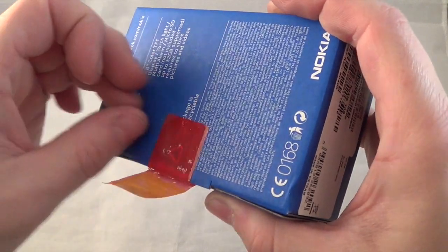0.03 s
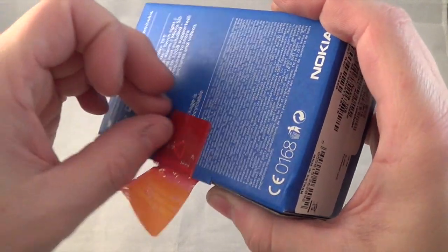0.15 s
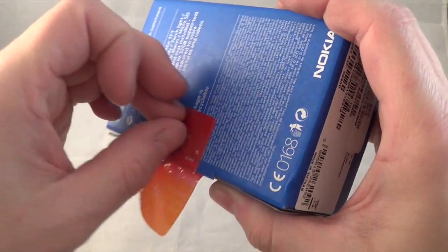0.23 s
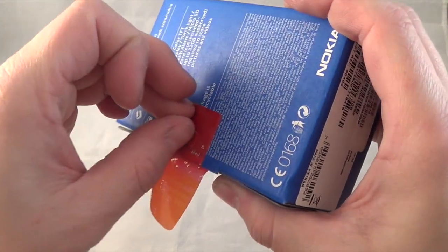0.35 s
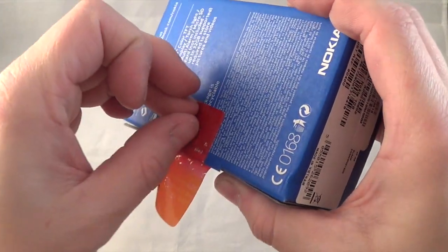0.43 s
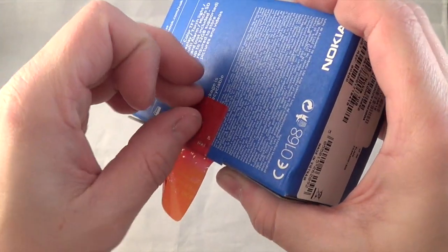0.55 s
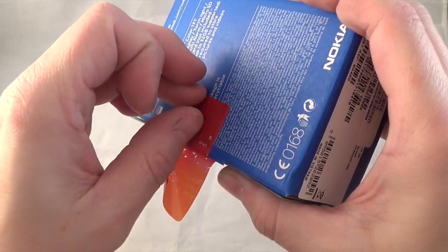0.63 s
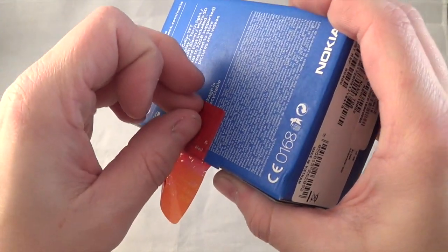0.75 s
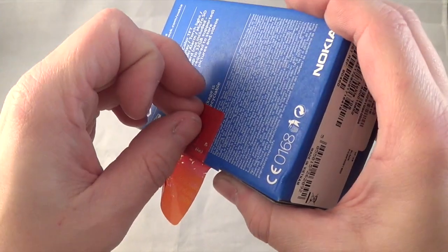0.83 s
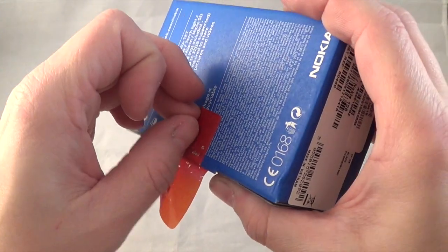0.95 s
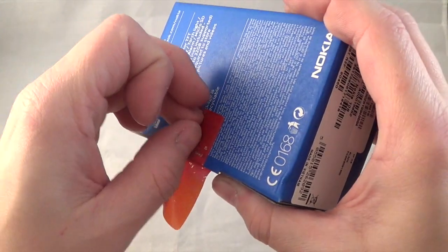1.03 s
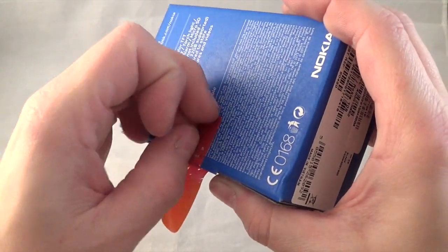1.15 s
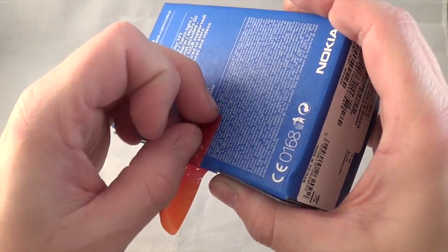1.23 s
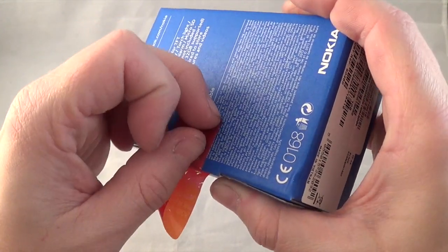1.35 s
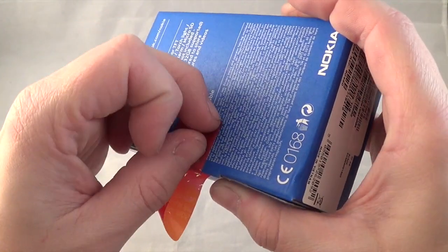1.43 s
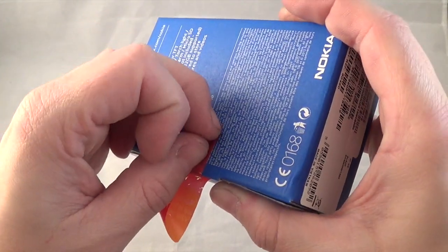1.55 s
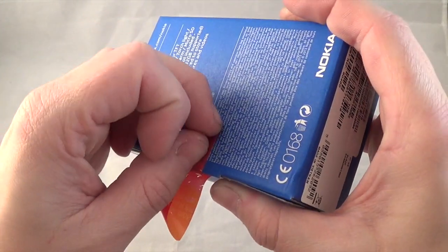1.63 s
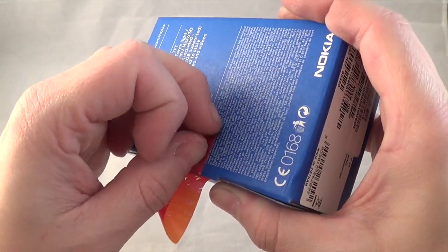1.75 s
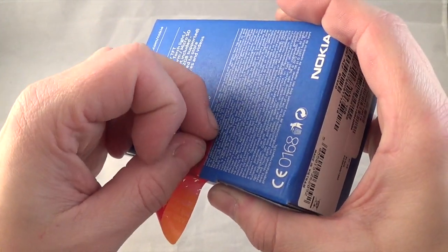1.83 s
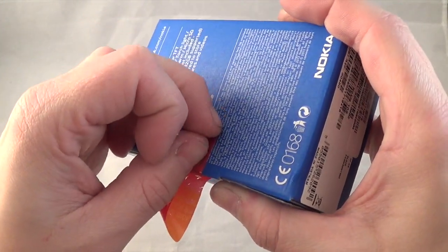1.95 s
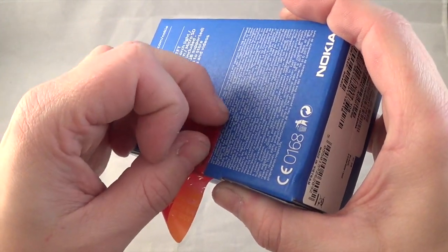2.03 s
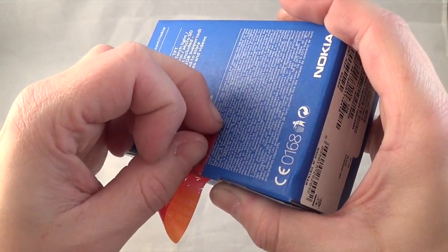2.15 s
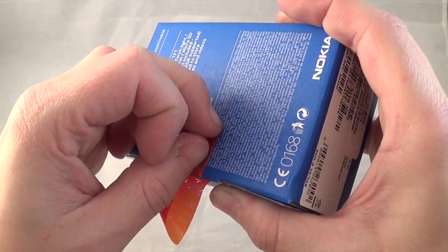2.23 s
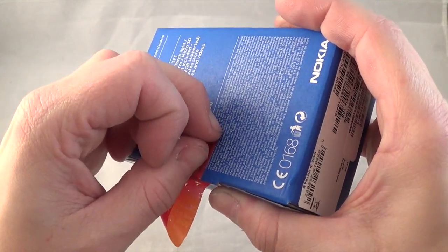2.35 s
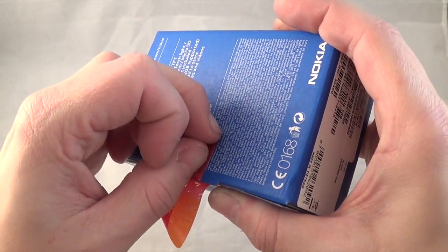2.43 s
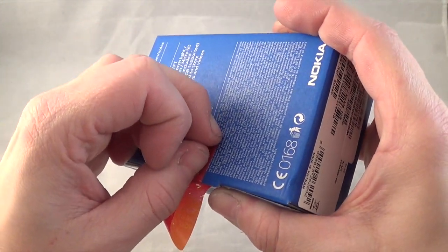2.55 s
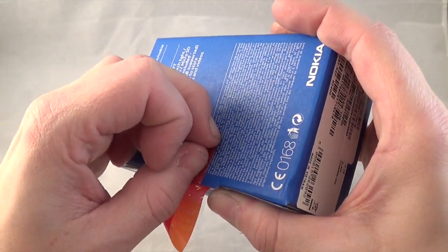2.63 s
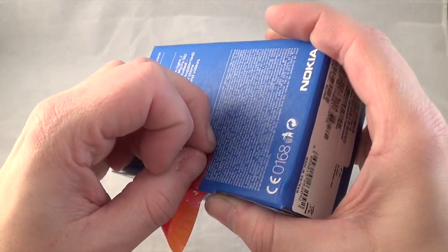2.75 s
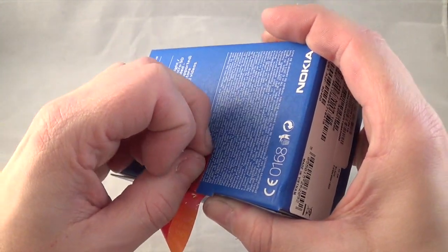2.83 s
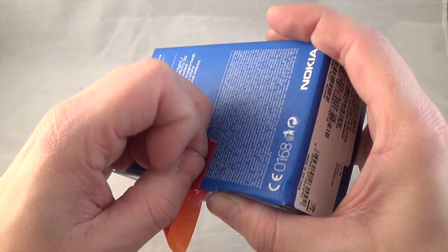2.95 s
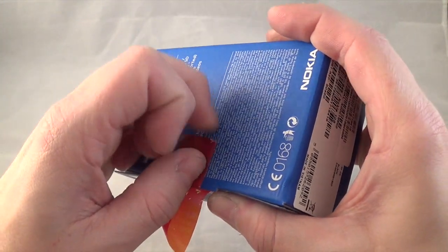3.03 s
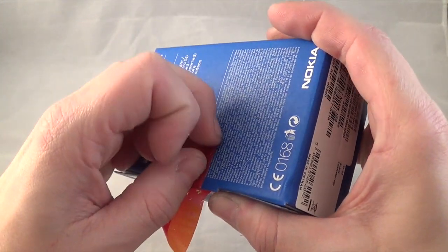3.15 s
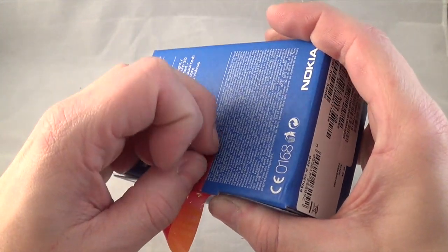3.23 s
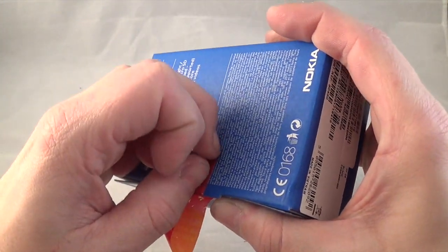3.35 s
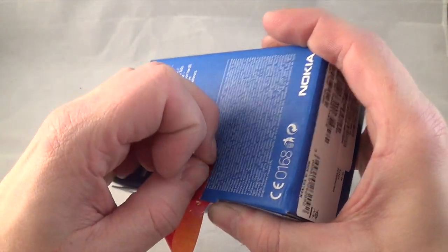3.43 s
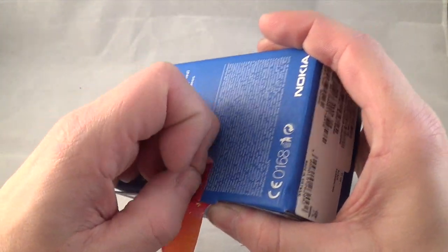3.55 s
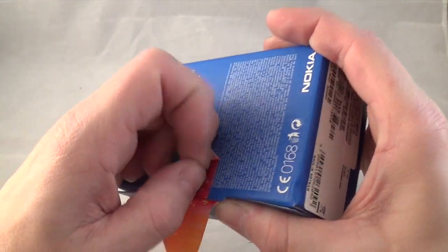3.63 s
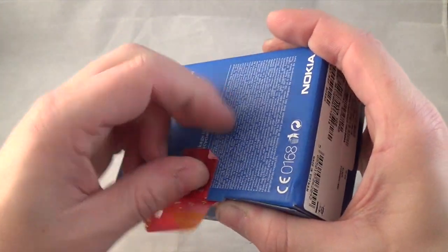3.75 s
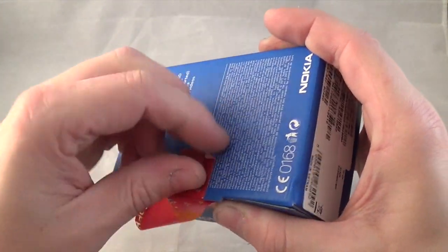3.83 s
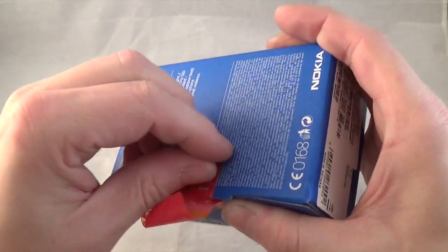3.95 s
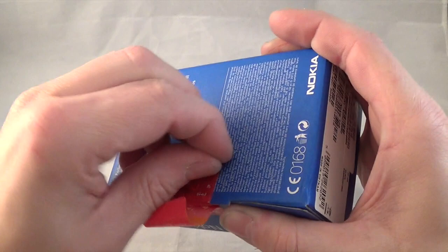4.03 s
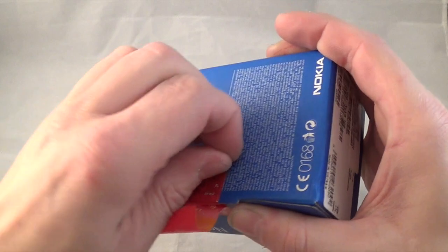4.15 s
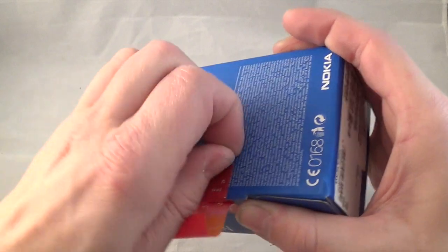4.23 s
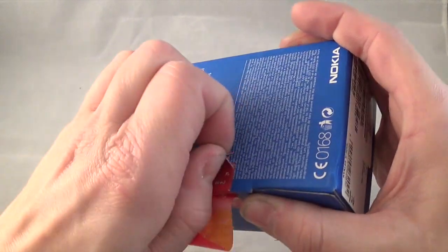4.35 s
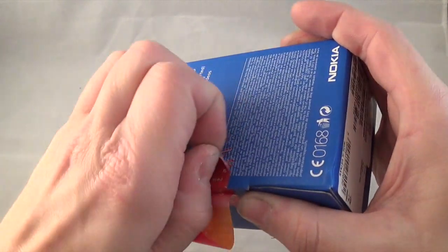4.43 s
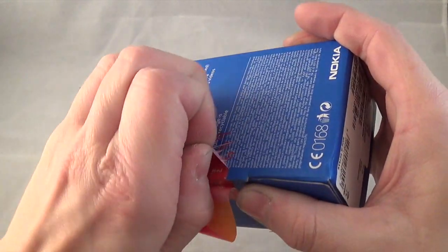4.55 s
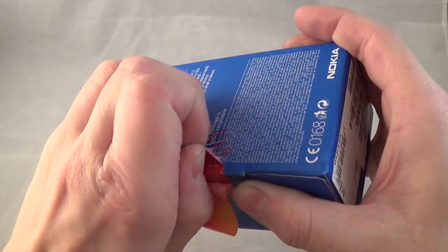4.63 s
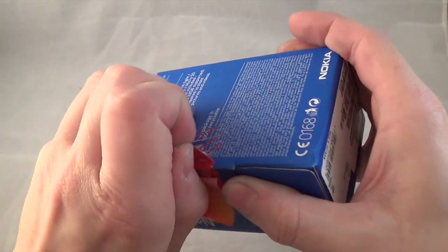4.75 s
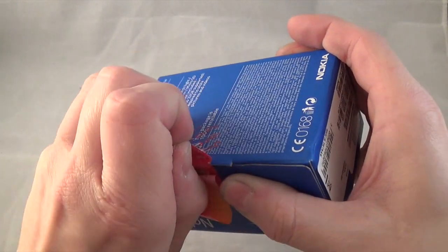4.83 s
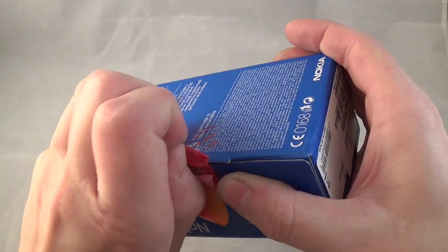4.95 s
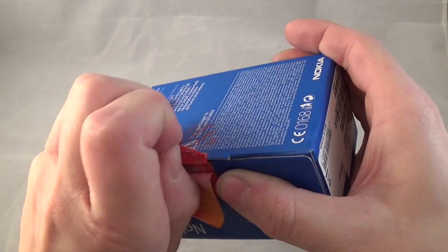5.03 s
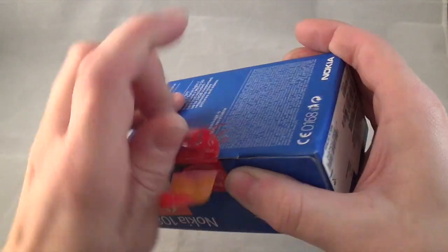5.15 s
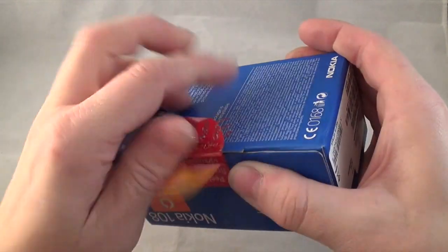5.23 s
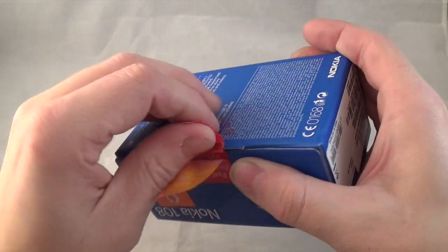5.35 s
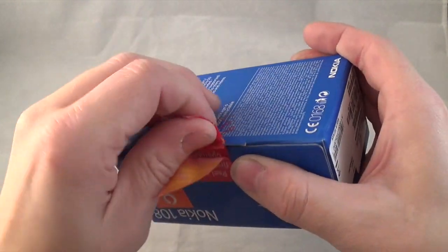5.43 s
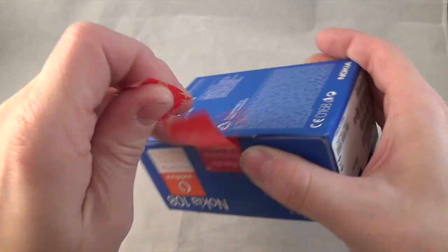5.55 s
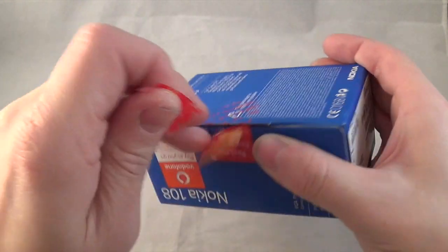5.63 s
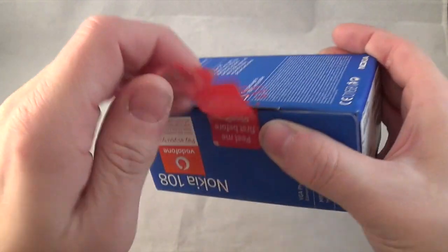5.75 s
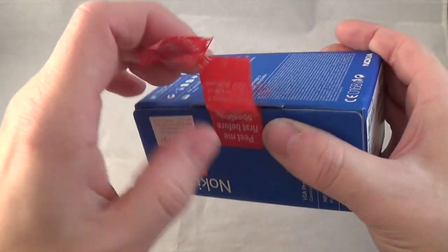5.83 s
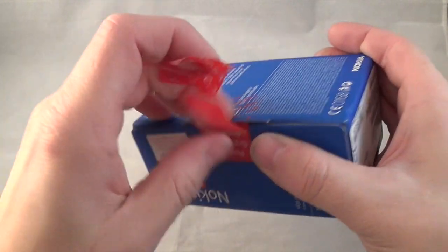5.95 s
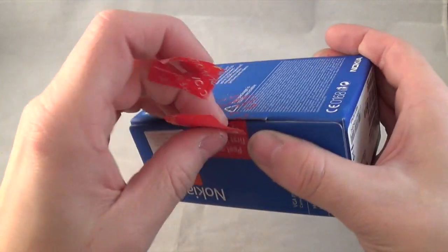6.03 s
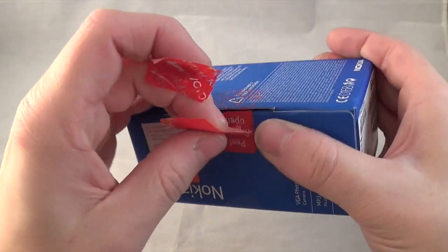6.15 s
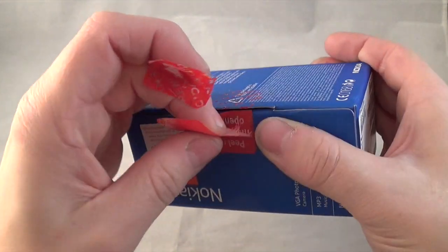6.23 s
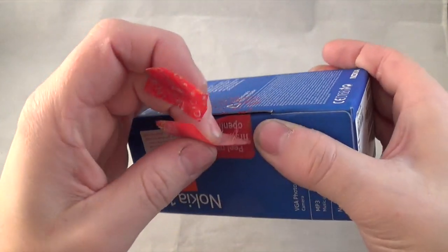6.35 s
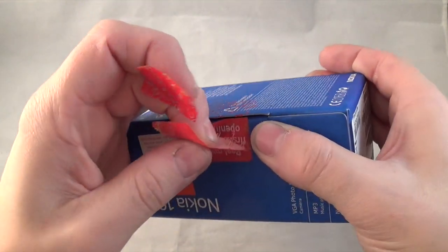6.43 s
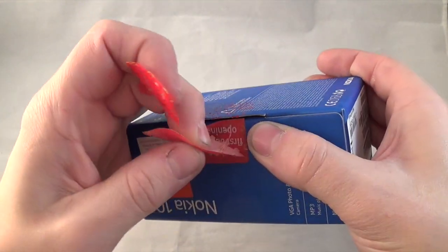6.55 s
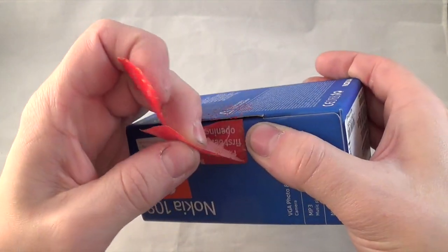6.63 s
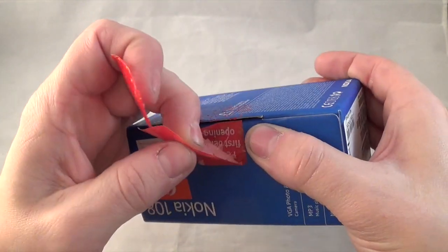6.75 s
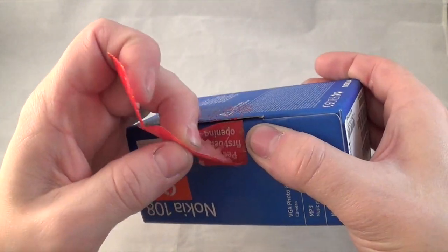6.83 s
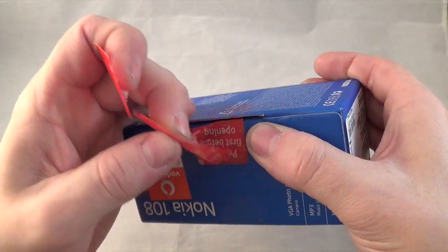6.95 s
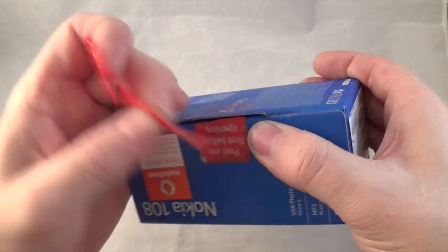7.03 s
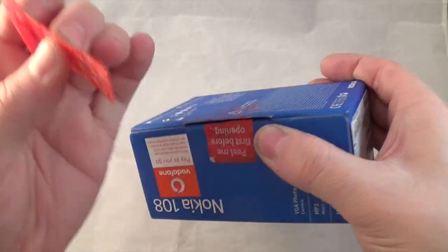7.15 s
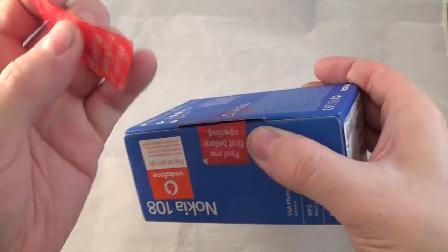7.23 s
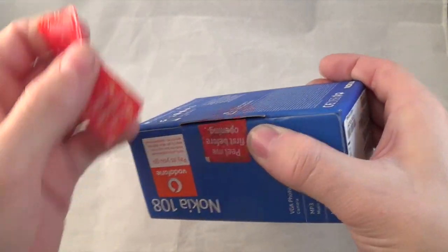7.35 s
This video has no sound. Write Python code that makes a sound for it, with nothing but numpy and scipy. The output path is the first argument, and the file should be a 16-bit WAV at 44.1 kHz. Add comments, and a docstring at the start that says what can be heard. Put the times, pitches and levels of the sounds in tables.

```python
"""A quiet room, in which fingers pick an adhesive sticker off a small cardboard box, close to a camera.
Impulsive release: nails and parting glue give short noise bursts in snaps and rips, coloured by the film.
Forced resonance: each jolt excites damped modes of the card face and of the hollow box.
Friction: skin on film and card gives uneven grains of noise. Diffuse decay: the room adds a faint tail.
Beneath lie steady room noise, a low hum that swells and sinks, and a thin high whistle."""
import sys
import numpy as np
from scipy import signal
from scipy.fft import rfft, irfft, next_fast_len
from scipy.io import wavfile
from scipy.ndimage import uniform_filter1d, map_coordinates

SR = 44100
rng = np.random.default_rng(int(sys.argv[2]) if len(sys.argv) > 2 else 0)


def dump(signal):
    """Clip the signal to [-1, 1] and save it as 16-bit WAV at the path in sys.argv[1]."""
    limited = np.clip(np.atleast_2d(signal).T, -1, 1)
    pcm = np.round(limited * 32767).astype(np.int16)
    wavfile.write(sys.argv[1], SR, pcm)


N = 325899  # length in samples

# Room noise spectrum: [f/Hz, relative level/dB per Hz]
AIR_SPECTRUM = [(25, -6), (231, 7), (604, -4.5), (1910, -4.5), (3180, -12), (4260, -8.5), (5420, -19.5),
                (14500, -21), (16000, -36)]
# Left-right correlation of the room noise: [f/Hz, correlation/1]
EAR_CORRELATION = [(60, 0.85), (240, 1), (950, 0.043), (3770, 0.63), (15000, 1.0)]
# Mean course of the hum: [t/s, level/dB]
HUM_COURSE = [(3.75, -71), (4.0, -60.5), (5.35, -57.5), (5.7, -66)]
HUM_HZ, WHISTLE_HZ = 113.5, 15625

# Reverberation of the room: [f/Hz, time to fall 60 dB/s]
ROOM_DECAY = [(200, 0.11), (1000, 0.35), (3000, 0.41), (8000, 0.027), (15000, 0.011)]
# Interaural tilt of the near sound: [f/Hz, left minus right level/dB]
EAR_TILT = [(100, -2.5), (300, -2.5), (1000, .6), (2500, .9), (5000, -.1)]
HANDS_DB, HANDS_T60 = -28, 0.016  # sound scattered off the hands: level/dB, decay/s
# a reflection near the microphone cancels part of this band
DIP_HZ, DIP_WIDTH_HZ, DIP_SHARE = 4250, 900, .72
CEILING, TOP_HZ = 0.75, 16600  # limit of the rounded peaks (full scale 1), band limit/Hz

# Colour of the thin film: [f/Hz, relative level/dB per Hz]
FILM_SPECTRUM = [(2060, -24.5), (3500, -1.5), (4300, 6.5), (6000, 2), (9820, 1.5), (12000, 1), (15200, -8),
                 (16100, -21), (16500, -61)]
# Modes of the card face: [f/Hz, width/Hz, relative level/dB]
FACE_MODES = [(1766, 370, 3), (2195, 393, 7.5), (3150, 1710, 5.5), (4560, 2280, -3.5)]
# Modes of the hollow box: [f/Hz, width/Hz, relative level/dB]
BODY_MODES = [(168.7, 27, -0.5), (217, 14, 2.5), (281, 35, 2.5), (381, 59, -0.5), (608, 83, 3),
              (792.6, 38.6, 5), (944, 110, 0), (1064, 136, 0), (1380, 294, -2.5)]
# Broad, quick push of the box walls under those modes: (f/Hz, width/Hz, relative level/dB)
WALL_PUSH = (447, 1050, -8.5)
# Resonances of skin rubbing on the film: [f/Hz, width/Hz, relative level/dB]
RUB_MODES = [(6000, 2000, -9), (8800, 3200, 0), (11500, 2000, -3)]

# Fingers on film and card, mean course: [t/s, film rustle level/dB, box body level/dB]
HANDLING_COURSE = [(0, -57, -63), (.45, -65, -62.5), (.9, -66, -73), (1.45, -62, -63), (2.3, -62.5, -64),
                   (2.55, -66, -60), (3.0, -60, -60), (3.5, -61, -59), (3.84, -50.5, -56.5),
                   (4.0, -63, -63), (4.25, -58, -58.5), (4.62, -39.5, -56.5), (4.8, -40, -56),
                   (5.05, -41.5, -52), (5.45, -55, -55.5), (5.52, -43.5, -61), (5.8, -63.5, -61),
                   (5.91, -49, -57.5), (6.42, -56.5, -54.5), (6.61, -47.5, -56), (6.81, -53, -61.5),
                   (7.06, -37.5, -54), (7.15, -40.5, -56), (7.24, -55, -48), (7.39, -44, -65.5)]
# the card face lies between film and body: share of the film's level, offset/dB
FACE_SHARE, FACE_OFFSET_DB = 0.4, -1.5

# Rips and scrapes, contact parting without a break:
# [start t/s, length/s, film level/dB, card face level/dB, box body level/dB]
RIP_EVENTS = [(0.001, 0.3, -50.5, -53, -51.5), (0.246, 0.094, -49.5, -44, -47),
              (0.618, 0.043, -57.5, -46.5, -54), (0.832, 0.017, -53, -37.5, -43),
              (0.925, 0.28, -54, -54, -62), (1.181, 0.05, -43.5, -44, -56),
              (1.202, 0.061, -48.5, -42.5, -51), (1.225, 0.22, -59.5, -48.5, -50.5),
              (1.823, 0.039, -40, -33.5, -37), (2.138, 0.064, -52, -42.5, -43), (2.95, 0.47, -68, -56, -59),
              (3.64, 0.044, -46, -50, -67), (3.905, 0.077, -44.5, -34.5, -44),
              (4.043, 0.089, -55.5, -59, -75), (4.369, 0.09, -39, -43.5, -50),
              (4.515, 0.12, -33.5, -45, -61), (4.651, 0.023, -29, -35, -44), (4.685, 0.02, -33.5, -37, -59),
              (4.736, 0.033, -24, -33, -65), (5.181, 0.033, -33.5, -51, -49),
              (5.221, 0.032, -30, -32.5, -40.5), (5.368, 0.065, -36.5, -43.5, -47.5),
              (5.478, 0.0093, -45, -42.5, -52), (5.545, 0.074, -26.5, -32, -59),
              (5.61, 0.084, -44, -43.5, -48.5), (5.814, 0.019, -50, -38, -66),
              (6.003, 0.025, -33, -38, -40.5), (6.045, 0.036, -48, -47, -43.5),
              (6.945, 0.1, -33.5, -38.5, -63), (7.021, 0.24, -40, -44, -42.5),
              (7.146, 0.08, -32.5, -31.5, -29)]
SMOOTH_DB, ROUGH_DB = -39, -31  # film level/dB: up to the first a smooth rub, from the second all crackle

# Knocks that set the box going: [t/s, blow drive level/dB, strongest f/Hz, low thump level/dB re blow,
# rattle decay time per 60 dB/s, wall ring level/dB re blow]; drive levels, before filters and mixing
KNOCK_EVENTS = [(0.764, -19.5, 179, -8, 0.059, -2), (.833, -22.5, 695, -10, 0.23, -6),
                (0.99, -25, 630, -16, 0.047, -4), (1.047, -30.5, 594, -9, 0.1, -8),
                (1.448, -22, 308, -8, 0.054, 3), (1.563, -17.5, 616, 2.5, 0.24, -7),
                (1.755, -30.5, 1300, -15, 0.42, -16), (1.88, -14, 610, -4, 0.16, -21),
                (2.071, -22.5, 587, -13, 0.61, -5), (2.289, -29, 206, 4.5, 0.23, -4),
                (2.433, -20, 700, -15, 0.015, -14), (2.678, -17.5, 524, -24, 0.12, -11),
                (2.91, -24.5, 615, -3, 0.18, -5), (2.946, -6.5, 625, -1.5, 0.25, -4),
                (3.207, -26, 620, -5, 0.54, -12), (3.598, -15.5, 580, -0.5, 0.16, -4),
                (3.877, -20.5, 527, -4, 0.051, -16), (4.658, -24, 1000, -6, 0.18, -5),
                (4.93, -2, 1800, -22, 0.21, -27), (5.228, -23, 850, -15, 0.2, -6),
                (5.306, -19, 534, -20.5, 0.069, -15), (5.37, -16, 166, -12, 0.33, -12),
                (5.596, -4.5, 1100, -36, 0.24, 5), (5.822, -19.5, 1400, -13.5, 0.084, -21),
                (6.686, -19, 397, -13, 0.092, -14), (6.948, -15.5, 624, -33, 0.14, -6),
                (7.129, -5, 575, -7.5, 0.51, -9)]

# Louder snaps of glue and nail: [t/s, film drive level/dB, card face drive level/dB re film, film pitch f/Hz];
# drive levels, before offsets and filters
SNAP_EVENTS = [(0.8333, -36.5, 11, 10100), (1.2026, -16.5, 0, 4350), (1.5631, -10.5, -0.5, 6600),
               (1.7309, -28, -3.5, 6400), (1.757, -9, -2.5, 6050), (1.8824, -14.5, -2.5, 6450),
               (2.0418, -33.5, -7, 6900), (2.0711, -10.5, -1.5, 6500), (2.4335, -29.5, -6, 9600),
               (2.6005, -23, -4.5, 7400), (2.679, -26.5, -1, 4550), (2.9472, -12.5, 4.5, 6030),
               (3.083, -33, -9, 5840), (3.2059, -28.5, -2.5, 6850), (3.5991, -20, -1, 7900),
               (3.6068, -17, -11, 5800), (3.6237, -14.5, -15, 5960), (3.7348, -21.5, -13, 10900),
               (3.7713, -24, -15, 6050), (3.8774, -32.5, 3, 9000), (4.1077, -30, -29, 6000),
               (4.2866, -29, -10.5, 5730), (4.3413, -25.0, -25, 8800), (4.3951, -12.5, -12, 14900),
               (4.401, -18, -21, 11800), (4.4104, -13, -32, 11400), (4.4149, -13.5, -23, 9100),
               (4.4245, -15.5, -21, 11300), (4.4426, -11, -35, 14300), (4.4618, -6, -24.5, 9700),
               (4.513, -17.5, -25, 9500), (4.5328, -9, -30, 10300), (4.5395, -7.5, -24, 9500),
               (4.5497, -9, -22, 7300), (4.5723, -9, -27, 6800), (4.5775, -9, -21, 6000),
               (4.5884, -6, -22, 8800), (4.6085, -12, -13.5, 6000), (4.6291, -23, -10, 7500),
               (4.6611, -7, -12, 9300), (4.6645, -12.5, -15, 6100), (4.6859, -13, -7, 7500),
               (4.7043, -11, -16, 11700), (4.7346, -12.5, -8.5, 11100), (4.7433, -4, -22, 7600),
               (4.7535, -8.5, -26, 11600), (4.8071, -5.5, -20, 9600), (4.8212, -12.5, -11, 7900),
               (4.8453, -30, -26, 9400), (4.8671, -6, -12, 7800), (4.9003, -8, -17, 9500),
               (4.9176, -25, -22, 5230), (4.9311, -1.5, -9, 6600), (4.993, -12.5, -19, 7800),
               (5.0006, -12, -34, 7660), (5.0288, -14.0, -16, 7560), (5.0323, -10.5, -24, 7800),
               (5.0424, -18, -26, 8000), (5.0523, -19, -24, 7900), (5.0713, -11.5, -14, 6100),
               (5.087, -6, -17, 7400), (5.111, -17, -10, 5360), (5.1671, -18, -12, 7840),
               (5.2103, -18, -14, 5000), (5.2182, -12.5, -13, 4900), (5.2345, -4.5, -20, 11700),
               (5.2573, -16.5, -6.5, 6060), (5.3066, -11.5, 0.5, 9000), (5.5257, -16, -18, 11300),
               (5.5352, -10.5, -23, 11100), (5.5486, -9.5, -11, 8850), (5.5663, -17, -16, 9000),
               (5.5695, -13, -6, 6160), (5.5779, -5, -14, 8700), (5.5859, -14, -13, 9200),
               (5.5897, -5.5, -13, 5900), (5.599, -7.5, -7.5, 4740), (5.6154, -10, -24, 10600),
               (5.8213, -32.5, 0, 9200), (6.0139, -11, -15, 6170), (6.0837, -19.5, -6, 5600),
               (6.1713, -20.5, -13, 9500), (6.1949, -23.5, 2, 4500), (6.2721, -17.5, -20, 9300),
               (6.3372, -18.5, -10.5, 9000), (6.3657, -15.5, -11.5, 9100), (6.4124, -9.5, -11, 9000),
               (6.5046, -13.5, -12.5, 5670), (6.5141, -11, -21, 6040), (6.5684, -5.5, -22, 10000),
               (6.5787, -6.5, -16.5, 12100), (6.5961, -11.5, -9.5, 6300), (6.6411, -5.5, -19.5, 11900),
               (6.679, -12, -17, 6000), (6.6861, -11.5, -9, 9900), (6.7086, -24, -11, 6300),
               (6.7247, -9.5, -12.5, 6100), (6.7348, -11, -20, 6450), (6.7459, -10, -14.5, 6240),
               (6.7865, -28, -12, 6450), (6.8377, -11.5, -11, 6900), (6.8434, -4.5, -19.5, 11900),
               (6.857, -8.5, -23, 6430), (6.8814, -27, -26, 6800), (6.8903, -6.5, -8, 5430),
               (6.9085, -7.5, -29, 6560), (6.9151, -7.5, -8.5, 10100), (6.9405, -5.5, -12, 6370),
               (6.9452, -6.5, -10, 6300), (6.9506, -9.5, -5, 9400), (6.9572, -21, -24, 6900),
               (6.9627, -14, -23, 10200), (6.9725, -9.5, -16, 10500), (6.9791, -9, -3, 6300),
               (6.9878, -11, -23, 10000), (6.9944, -2, -21, 10100), (7.0, -6, -9, 9600),
               (7.0218, -15, -11, 9900), (7.0357, -15, -19, 9200), (7.043, -6, -25, 12600),
               (7.0559, -14, -8, 9600), (7.0684, -4.5, -18, 8800), (7.0814, -10, -25, 12100),
               (7.0951, -27, -25, 10700), (7.1043, -5.5, -25, 12000), (7.1138, -2.5, -32, 9400),
               (7.1196, -14.5, -9.5, 11800), (7.125, -18, -28, 9600), (7.1295, -3.5, -23, 10700),
               (7.1468, -6, -23, 6800), (7.3102, -14.5, -11, 7900), (7.3497, -11.5, -8.5, 9100),
               (7.3747, -24, -9, 8300)]
SNAP_T60 = .0013  # decay/s of the sudden part: the glue lets go all at once
# small snaps fall at random, thicker and louder as the film rustles more
SMALL_COUNT, SMALL_THICKENS = 200, 1.1  # number; dB of rate per dB of rustle
SMALL_LEAST_DB, SMALL_SPREAD_DB = 10.5, 8  # least drive level/dB over the rustle, range above it/dB
SMALL_MEAN_FACE_DB = -20  # mean card face drive level/dB re film
SMALL_LOW_HZ, SMALL_HIGH_HZ = 5700, 11700


def amp(db):
    """Level definition: the amplitude ratio of a level in dB."""
    return 10 ** (np.asarray(db) / 20)


def unit(x):
    """Normalisation: x scaled to rms 1."""
    return x / np.sqrt(np.mean(x ** 2) + 1e-20)


def along(points, hz):
    """Interpolation of (f/Hz, value) points on a logarithmic frequency axis."""
    f, v = np.transpose(points)
    return np.interp(np.log(hz + 1), np.log(f + 1), v)


def curves(rows):
    """Interpolation in time: one value per sample for each column after t/s."""
    s, *columns = np.transpose(rows)
    return [np.interp(np.arange(N) / SR, s, column) for column in columns]


def wobble(rate):
    """Slow random modulation: a smooth curve through rate random knots a second."""
    knots = rng.standard_normal(int(N * rate / SR) + 4)
    return map_coordinates(knots, [np.arange(N) * rate / SR])


def filtered(x, response):
    """Linear filtering: the spectrum of x times a complex response of frequency."""
    m = next_fast_len(N + SR // 2)
    f = np.fft.rfftfreq(m, 1 / SR)
    return irfft(rfft(x, m) * response(f), m)[..., :N]


def place(s, rows):
    """Superposition: short sounds summed at their times s."""
    at = np.round(s * SR).astype(int)[:, None] + np.arange(rows.shape[1])
    return np.bincount(at.ravel(), rows.ravel(), N + SR)[:N]


def background():
    """Stationary sources: partly correlated room noise, and two sines for the swelling hum and the whistle."""
    def split(hz):
        angle = np.arccos(np.clip(along(EAR_CORRELATION, hz), -1, 1)) / 2
        return amp(along(AIR_SPECTRUM, hz)) * [np.cos(angle), np.sin(angle)]
    mid, side = filtered(rng.standard_normal((2, N)), split)
    air = amp(-57.0) * unit(np.array([mid + side, mid - side]))
    t = np.arange(N) / SR
    hum_level = amp(curves(HUM_COURSE)[0] + 0.64 * wobble(3.67))
    hum = hum_level * np.sqrt(2) * np.sin(2 * np.pi * HUM_HZ * t)
    whistle_level = amp(-65 + 1.2 * wobble(30))
    whistle = whistle_level * np.sqrt(2) * np.sin(2 * np.pi * WHISTLE_HZ * t)
    return air + hum + whistle


def room(x):
    """Diffuse reverberation: a noise tail for each ear, each frequency decaying at its own rate."""
    hz, _, z = signal.stft(rng.standard_normal((2, SR // 2)), SR, nperseg=256)
    t = np.arange(z.shape[-1]) * 128 / SR
    decay = amp(-60 * t / along(ROOM_DECAY, hz)[:, None])
    tail = signal.istft(z * decay, SR, nperseg=256)[1]
    delayed = np.pad(x, (150, 0))[None]  # 3.4 ms
    return signal.fftconvolve(delayed, tail / np.linalg.norm(tail[0]), axes=1)[:, :N]


def ringing(x, modes):
    """Modal resonance: damped modes of alternating sign, scaled so that white noise keeps its level."""
    def response(f):
        h = sum((-1) ** k * amp(db) * 1j * f * w / (c * c - f * f + 1j * f * w)
                for k, (c, w, db) in enumerate(modes))
        return h / np.sqrt(np.mean(abs(h) ** 2))
    return filtered(x, response)


def film(x):
    """Radiation from a thin film: a minimum-phase, hence causal, filter that keeps the level of white noise."""
    spectrum = amp(along(FILM_SPECTRUM, np.fft.rfftfreq(1024, 1 / SR)))
    cepstrum = irfft(np.log(spectrum + 1e-6))
    cepstrum[1:512] *= 2  # folding the cepstrum forward makes the phase minimal
    cepstrum[513:] = 0
    pulse = irfft(np.exp(rfft(cepstrum)))[:512]
    return signal.fftconvolve(x, pulse / np.linalg.norm(pulse))[:N]


def grit(spiky_db):
    """Stick-slip friction: noise of rms 1 made of tiny releases of very uneven size."""
    return unit(rng.standard_normal(N) * amp(spiky_db * wobble(700) + .5 * spiky_db * wobble(90)))


def crackle(rate, size_db, cycles):
    """Shot noise of rms 1: random ticks, each a scrap of film ringing briefly at its own pitch."""
    at, pitch, size = rng.random((int(rate * N / SR), 3)).T
    hz, t = 4800 * 2.9 ** pitch[:, None], np.arange(128) / SR
    strength = amp(-size_db * np.log(size[:, None])) * np.sqrt(hz)
    ticks = strength * np.exp(-t * hz / cycles) * np.sin(2 * np.pi * hz * t)
    return unit(place(at * N / SR, ticks))


def patchy(x, depth_db):
    """Spectral modulation: the colour shifts from moment to moment as other scraps of the surface move."""
    z = signal.stft(x, nperseg=256)[2]
    field = uniform_filter1d(rng.standard_normal(z.shape), 7, 0)  # smooth over frequency, then time
    field = uniform_filter1d(field, 5, 1)
    return unit(signal.istft(z * amp(depth_db * unit(field)), nperseg=256)[1][:N])


def handling():
    """Sliding friction: skin on film and card in uneven small grains; returns film, face and body drives."""
    film_db, body_db = curves(HANDLING_COURSE)
    face_db = FACE_SHARE * film_db + (1 - FACE_SHARE) * body_db + FACE_OFFSET_DB
    stir = wobble(25)
    sheet = grit(0.99) + .5 * crackle(800, 2, 5)
    grains = [patchy(sheet, 3.7), patchy(grit(1), 3), grit(3)]
    return amp(np.array([film_db, face_db, body_db]) + 4.2 * stir) * grains


def rips():
    """Dense releases: faint rips a smooth rub that swells, strong ones a crackle with a quicker onset."""
    t, gains, rough = np.arange(N) / SR, np.zeros((3, N)), np.zeros(N)
    for s, length, *db in RIP_EVENTS:
        harsh = np.clip((db[0] - SMOOTH_DB) / (ROUGH_DB - SMOOTH_DB), 0, 1)
        rise = (0.26 - 0.17 * harsh) * length
        opening = np.clip((t - s) / rise, 0, 1)
        closing = np.clip((s + length - t) / (0.27 * length), 0, 1)
        gate = opening * closing
        gains += amp(db)[:, None] * gate
        rough = np.maximum(rough, (gate > 0) * harsh)
    sheet = grit(2.5) + 1.6 * crackle(900, 2.2, 8)
    crackling = np.array([patchy(sheet, 3.7), patchy(grit(1.2), 3.6), grit(0.86)])
    rubbing = np.array([ringing(patchy(grit(2.6), 2), RUB_MODES), patchy(grit(1.6), 4.5), grit(0.8)])
    return gains * (np.sqrt(rough) * crackling + np.sqrt(1 - rough) * rubbing)


def bursts(db, t60, tail_db, tail_t60, size):
    """Impulsive release: for each level a sudden noise burst with a weaker, longer after-crackle of ticks."""
    t = np.arange(size) / SR
    rise = 1 - np.exp(-6 * (t + 1 / SR) / t60)
    head = rise * amp(-60 * t / t60) * rng.standard_normal((len(db), size))
    head /= np.sqrt(np.sum(head ** 2, axis=1, keepdims=True) / (t60 * SR))
    lumps = amp(3.6 * np.repeat(rng.standard_normal((len(db), size // 16)), 16, axis=1))
    tail = amp(tail_db - 60 * t / tail_t60) * lumps * rng.standard_normal((len(db), size))
    return amp(db)[:, None] * (0.34 * head + tail)


def pitched(rows, hz, sharp, flat):
    """Single resonance of quality factor sharp for each row, beside a broad share that thins out higher up."""
    f, c = np.fft.rfftfreq(rows.shape[1], 1 / SR), hz[:, None]
    broad = flat / (1 + 1j * f / (7.3 * c))
    width = f * c / sharp
    resonance = 1j * width / (c * c - f * f + 1j * width)
    return irfft(rfft(rows) * (broad + resonance))


def knocks():
    """Forced and free vibration: blows jolt the box and its walls ring; returns blows, thumps and rings."""
    s, db, hz, thump_db, t60, ring_db = np.transpose(KNOCK_EVENTS)
    tail_t60 = t60[:, None]
    blows = pitched(bursts(db, 0.0035, -22.5, tail_t60, size=16384), hz, sharp=2.7, flat=0.072)
    # the struck wall sings on
    rings = pitched(bursts(db + ring_db, 0.005, -9, tail_t60, size=16384), hz, sharp=24, flat=0)
    # the whole box bounces in the hand
    thumps = bursts(db + thump_db, 0.0036, -19.5, 1.42 * tail_t60, size=16384)
    thumps = pitched(thumps, np.full_like(hz, 225), sharp=2.02, flat=0)
    return place(s, blows), place(s, thumps), place(s, rings)


def small_snaps():
    """Inhomogeneous random process: rows like SNAP_EVENTS, drawn more densely where the film rustles more."""
    rustle_db = curves(HANDLING_COURSE)[0]
    passed = np.cumsum(amp(SMALL_THICKENS * rustle_db))
    when, size, tone, pitch = rng.random((SMALL_COUNT, 4)).T
    slot = (np.arange(SMALL_COUNT) + when) / SMALL_COUNT
    at = np.interp(slot, passed / passed[-1], np.arange(N))
    db = rustle_db[at.astype(int)] + SMALL_LEAST_DB + SMALL_SPREAD_DB * size
    face_db = SMALL_MEAN_FACE_DB * 2 * tone
    hz = SMALL_LOW_HZ * (SMALL_HIGH_HZ / SMALL_LOW_HZ) ** pitch
    return np.transpose([at / SR, db, face_db, hz])


def snaps():
    """Sudden release of stored strain: each snap shakes the film and the card face; returns both drives."""
    s, db, face_db, hz = np.vstack([SNAP_EVENTS, small_snaps()]).T
    scraps = pitched(bursts(0 * db, SNAP_T60, -15, 0.036, size=2048), hz, sharp=7, flat=0.26)
    scraps /= abs(scraps).max(axis=1, keepdims=True)
    sheet = place(s, amp(db - 1.0)[:, None] * scraps)
    card = place(s, bursts(db + face_db + 4, SNAP_T60, -22.0, 0.066, size=4096))
    return sheet, card


def scene():
    """Superposition: film, face and box radiate together, then reach two ears with scatter, room and noise."""
    snap_sheet, snap_card = snaps()
    blows, thumps, rings = knocks()
    # snaps reach the box weakly, through the card face
    struck = np.array([snap_sheet, snap_card + amp(-1.5) * blows, blows + thumps + amp(-14.0) * snap_card])
    sheet, face, body = struck + rips() + handling()
    box = film(sheet) + ringing(face, FACE_MODES) + ringing(body, [*BODY_MODES, WALL_PUSH]) + amp(6) * rings

    def dip(f):
        width = 1j * f * DIP_WIDTH_HZ
        return 1 - DIP_SHARE * width / (DIP_HZ ** 2 - f * f + width)
    box = filtered(box, dip)
    near = filtered(box, lambda hz: amp(along(EAR_TILT, hz) * np.array([[.5], [-.5]])))
    scatter = rng.standard_normal(512) * amp(-60 * np.arange(512) / SR / HANDS_T60)
    hands = amp(HANDS_DB) * signal.fftconvolve(box, scatter / np.linalg.norm(scatter))[:N]
    # opposite signs make the scattered sound unlike in the two ears
    return near + hands * [[1], [-1]] + amp(-20.5) * room(box) + background()


def record(dry):
    """Saturation and band limitation: the camera rounds off high peaks and keeps nothing from TOP_HZ up."""
    soft = dry / (1 + abs(dry / CEILING) ** 4) ** .25
    return filtered(soft, lambda hz: hz < TOP_HZ)


dry = scene()
out = record(dry)
dump(out)
```